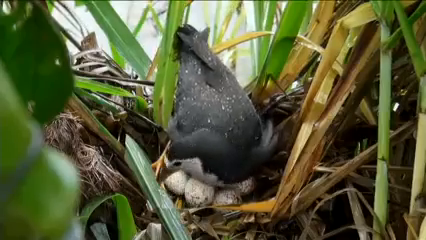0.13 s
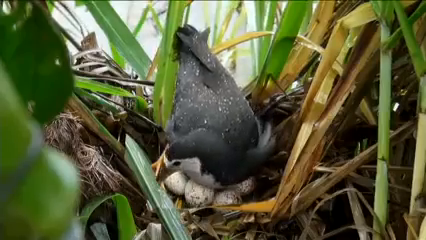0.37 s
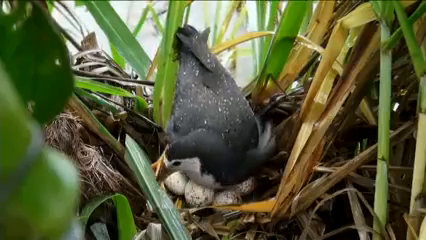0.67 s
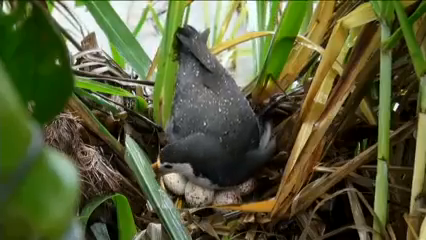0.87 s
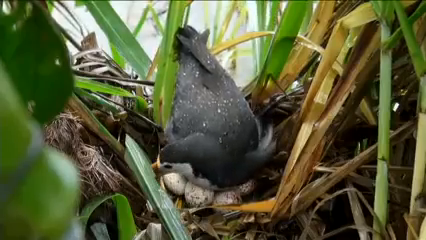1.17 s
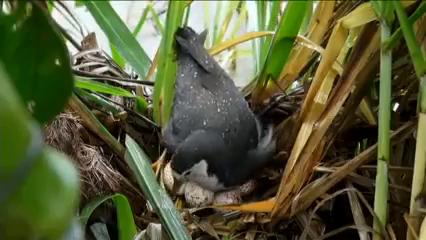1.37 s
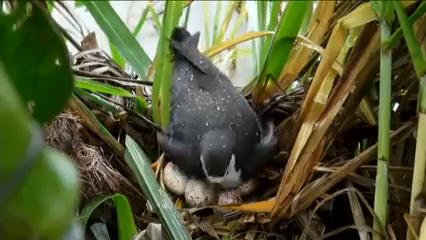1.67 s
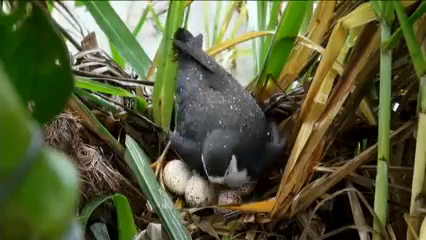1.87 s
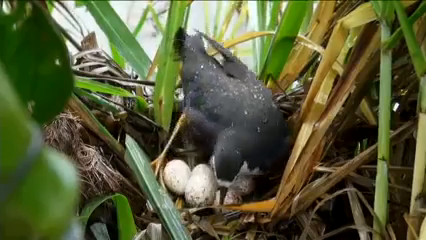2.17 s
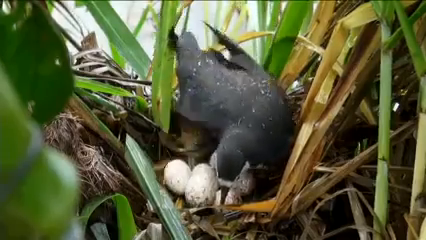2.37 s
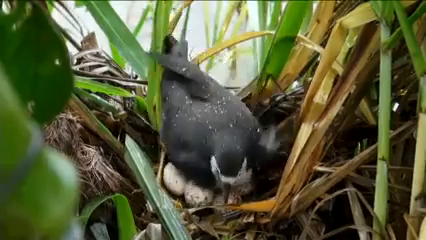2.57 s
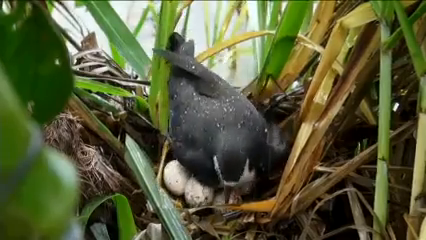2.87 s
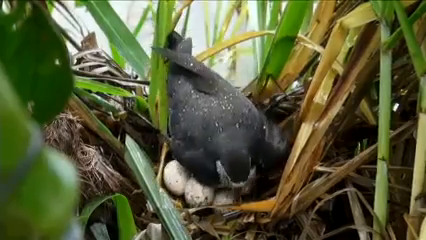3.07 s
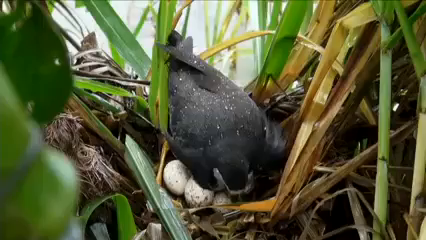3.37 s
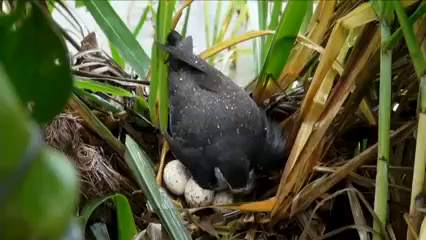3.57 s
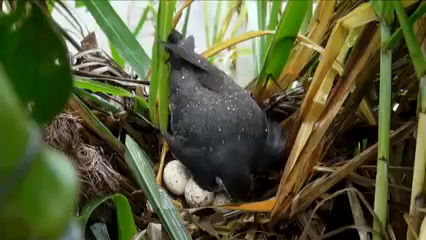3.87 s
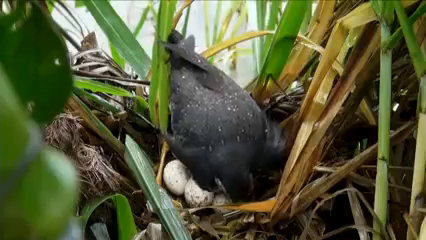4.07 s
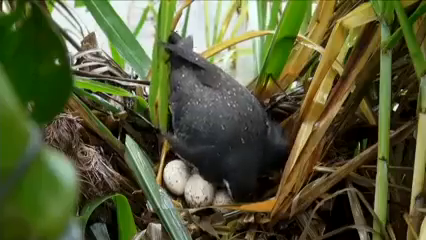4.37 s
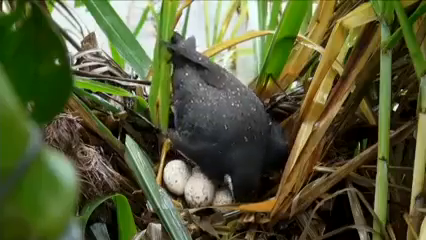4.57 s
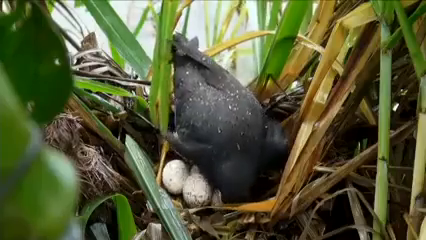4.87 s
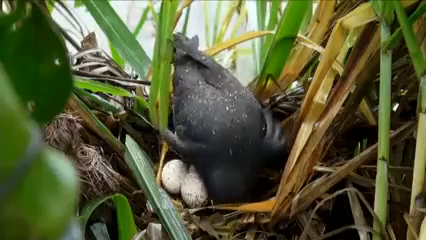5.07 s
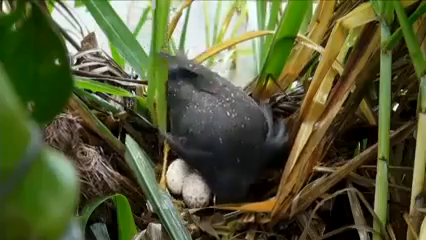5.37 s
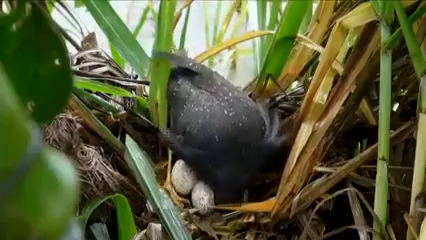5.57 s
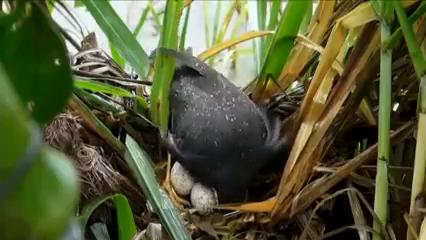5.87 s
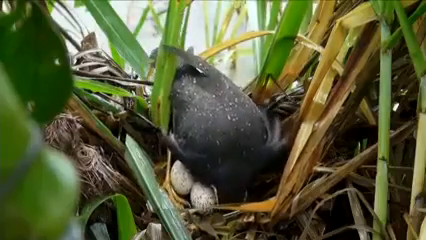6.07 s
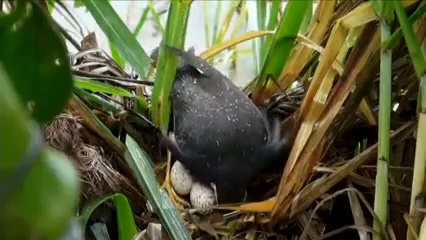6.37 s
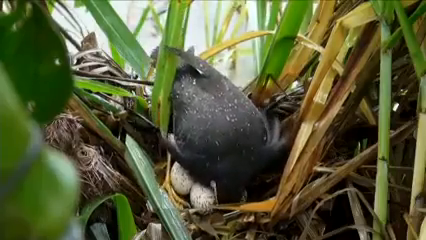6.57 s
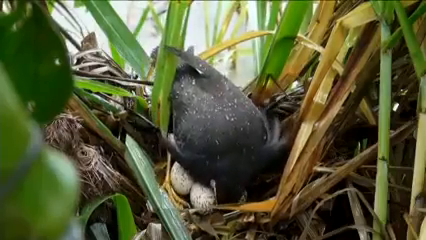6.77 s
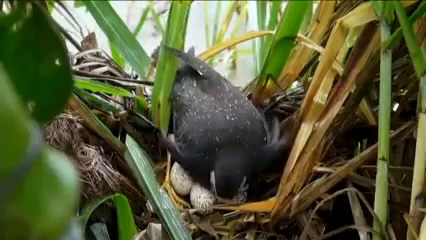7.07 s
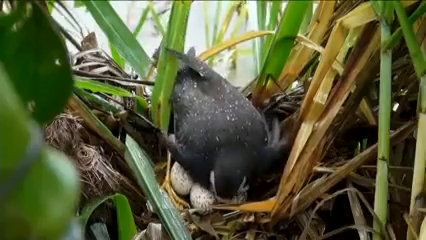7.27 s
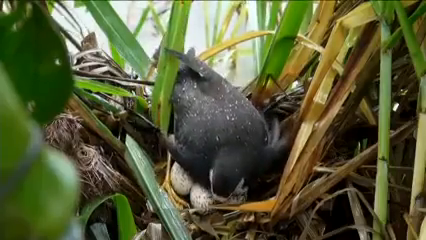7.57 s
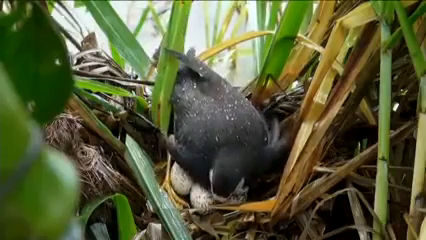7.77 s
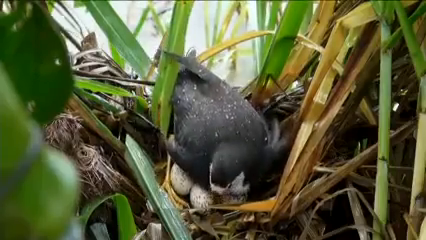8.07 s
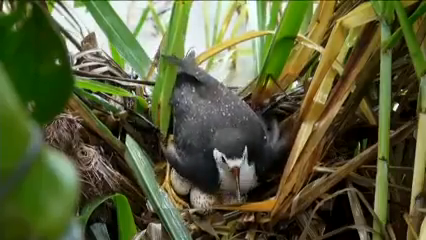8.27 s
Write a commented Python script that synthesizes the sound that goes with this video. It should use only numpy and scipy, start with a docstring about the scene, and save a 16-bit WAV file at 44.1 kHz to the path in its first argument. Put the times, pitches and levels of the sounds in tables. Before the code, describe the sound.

Close, irregular raindrops smack broad leaves and tick on dry stems over a soft, continuous wash of rainfall outdoors.

```python
"""A steady hiss of rain on a reed bed, soon broken by heavy drops that slap leaves close by.
Each heavy drop excites short blade modes, a crack and spray; its leaf knocks and shudders, then echoes.
Shattered drops patter in quick runs, droplets ring stems, and small drops tick on blades all around.
Far rain is band-filtered noise mixed with random impulses. The bed dips briefly at some of the slaps.
Damped resonances, decaying bursts of force and differences between the channels shape every near drop."""
import sys
import numpy as np
from scipy.fft import rfft, irfft, next_fast_len
from scipy.io import wavfile
from scipy.ndimage import uniform_filter1d, map_coordinates

SR = 44100
rng = np.random.default_rng(int(sys.argv[2]) if len(sys.argv) > 2 else 0)


def unload_wav(signal):
    """Save mono or channel-first audio to the path in sys.argv[1] as 16-bit WAV at rate SR, clipped to [-1, 1]."""
    wavfile.write(
        sys.argv[1],
        SR,
        np.round(np.clip(np.atleast_2d(signal).T, -1, 1) * 32767).astype(np.int16),
    )


N = 370881

# the loudest drops; a taut leaf only knocks, a loose one swings on:
# (time [s], slap level [dB], slap reference pitch [Hz], crack level [dB], spray level [dB],
#  thump level [dB], thump reference pitch [Hz], swing level [dB], left over right [dB])
HEAVY_DROPS = [(0.1143, -38, 1970, -39, -39, -37, 299, -41, 9),
               (0.1788, -23, 1500, -35, -53, -36, 397, -42.5, 8),
               (0.2823, -24, 1130, -45, -49, -43, 600, -45.5, 11),
               (0.312, -32, 1430, -33, -47, -34, 421, -47.5, 7),
               (0.3932, -30, 1110, -58, -45, -38, 205, -49, 7),
               (0.5632, -27, 1380.0, -42, -38, -33, 276, -41.5, 8),
               (0.572, -32, 1120.0, -35, -49, -29, 395, -46, 9),
               (0.6327, -53, 940.0, -58, -56, -32, 336, -43.5, 7),
               (0.7944, -55.0, 1200.0, -51, -55, -38.5, 334.0, -52, 8),
               (0.9258, -19.5, 1470, -23.5, -53, -26.5, 281, -42.5, 7),
               (1.236, -33, 1400.0, -37, -47, -36, 285, -65, 6),
               (1.2689, -24.5, 1360, -30, -59, -39, 613, -46, 2.5),
               (1.7096, -32, 1210, -41, -63, -33, 409, -47, -9.5),
               (1.9449, -32, 1020, -36, -47, -33.5, 350, -42, 8),
               (2.219, -55.0, 1100.0, -47, -62, -31.5, 258, -45.5, -3),
               (2.2497, -52, 1920.0, -28.5, -38, -36, 190, -50, 1),
               (2.3181, -21, 1210, -32, -39, -53, 606, -45.5, 3),
               (2.378, -47, 1100.0, -48, -70, -40, 402, -47, 8),
               (2.5205, -28.5, 920, -40, -50, -34.5, 571, -43.5, -4),
               (2.9393, -27.5, 1100, -32, -44, -28.5, 250, -37.5, -6),
               (2.95, -47, 1060.0, -49, -43, -33, 524, -37.5, -10),
               (3.1001, -25, 1190, -40, -40.5, -45, 597, -43.5, 5.5),
               (3.471, -22.5, 1100, -37, -65, -34, 571, -53, 5),
               (3.7489, -24.5, 1260, -46, -39, -37, 360, -40, 7),
               (3.7943, -32.5, 1710.0, -38, -37, -27.5, 315, -39, 8),
               (3.9436, -38, 1700.0, -40, -40, -35.5, 424, -50, -6),
               (4.1415, -35, 1164, -48, -36, -31.5, 202, -36.5, 8),
               (4.3644, -38, 1025, -55, -56, -38.5, 384, -57, 8),
               (4.546, -24.5, 1000.0, -58, -69, -25.5, 320, -37, -15),
               (4.761, -34.5, 1500, -34, -44, -35.5, 322, -45, 0),
               (4.8177, -34, 1330, -59, -50, -35.5, 371, -47, -5),
               (4.9956, -36, 1120, -48, -62, -39, 450, -54, 3.0),
               (5.1737, -24.5, 1390, -30.5, -33.5, -26, 393, -35.5, -6),
               (5.228, -27, 1210, -51, -41, -32.5, 362, -44, -10),
               (5.3174, -29.5, 1810, -30, -40, -36.5, 332, -47, 4),
               (5.523, -20, 1930, -48, -38, -36.5, 437, -45, 5),
               (5.757, -30.5, 1460, -46, -43, -45, 343, -54, 8),
               (5.809, -30.5, 940, -65, -62, -29, 408, -44.5, 9),
               (5.9044, -26.5, 1460, -31.5, -41, -35.5, 428, -43, 9.5),
               (6.086, -32, 2670, -38, -28, -61, 580, -51.5, -1),
               (6.2431, -21.5, 1540, -33, -30.5, -37, 403, -40.5, -3),
               (6.2828, -21.5, 1240, -30, -56, -55.0, 680, -53, 9),
               (6.3396, -31.5, 1370, -34, -56, -37, 320, -46.5, 7),
               (6.4378, -28, 1900, -28, -30.5, -31, 168.5, -42, -9),
               (6.537, -40, 1710.0, -33, -36, -33.5, 270, -51, 3),
               (6.632, -58, 950.0, -55, -63, -34.5, 530, -42, 9),
               (6.7625, -28.5, 1660, -43, -35, -30.5, 271, -44, -6),
               (6.787, -23, 1900, -54, -44, -52, 410.0, -67.0, -1),
               (6.8061, -27.5, 1400, -33, -38, -41, 432.0, -52, 0),
               (7.1174, -22.5, 760, -34, -49, -30, 203, -35.0, -9),
               (7.186, -22, 1600, -27.5, -44, -41, 680, -49, 2.5),
               (7.236, -32, 910, -42, -56, -34, 230, -49, -9),
               (7.297, -26.5, 1800, -35, -41, -64, 507, -53, -3),
               (7.3757, -32.5, 1230, -33, -54, -32.5, 321, -43, 5),
               (7.6118, -51, 950.0, -49, -66, -29.5, 313, -40.0, 5),
               (7.6992, -45, 2590, -51, -32, -34, 288, -41, 5),
               (7.7628, -33.5, 1360, -44, -50, -37, 297, -65.0, -6),
               (7.7873, -56, 1100.0, -49, -43, -29.5, 549, -52, -6),
               (7.8722, -30, 1300, -40, -52, -41, 367, -53, -3),
               (7.876, -28, 1700, -41, -57, -40, 390, -44, -3),
               (7.9856, -26, 1520, -26, -38, -63, 714, -71, -2),
               (8.2, -31, 1430, -43, -46, -50, 535, -47, 4),
               (8.222, -33, 1050.0, -53, -59, -56, 330, -44.5, 5)]
# spectrum of the fine spray thrown off by a drop: (frequency [Hz], level per Hz [dB])
SPRAY_SPECTRUM = [(2500, 5), (4500, 15.5), (6000, 9.5), (7300, 4), (8500, 0), (12000, -6), (16000, -23)]

SPAN = 8192  # samples that one drop may last
AGE = np.arange(SPAN) / SR  # time since a blow [s]
FREQS = np.fft.rfftfreq(SPAN, 1 / SR)  # [Hz]
ECHO_S = .091  # delay of the echo
# a bending leaf starts sharp by this fraction and sags in pitch with this time constant [s]
SHARP, SAG_S = 0.59, 0.0033


def amp(db):
    """Level in decibels to amplitude ratio."""
    return 10 ** (np.asarray(db) / 20)


def unit(x):
    """Normalization to an rms value of 1."""
    return x / np.sqrt(np.mean(x ** 2) + 1e-20)


def along(points, hz):
    """Linear interpolation of (Hz, value) points on a logarithmic frequency axis."""
    f, v = np.transpose(points)
    return np.interp(np.log(hz + 1), np.log(f + 1), v)


def wobble(rate):
    """Slow random modulation: a smooth curve through rate random knots a second."""
    knots = rng.standard_normal(int(N * rate / SR) + 4)
    return map_coordinates(knots, [np.arange(N) * rate / SR])


def lumps(depth_db, size):
    """Stepwise random modulation: a gain that jumps every size samples."""
    return amp(depth_db * rng.standard_normal(SPAN // size)).repeat(size)


def filtered(x, response):
    """Linear filtering: the spectrum of a whole track times a frequency response."""
    m = next_fast_len(N + SPAN)
    return irfft(rfft(x, m) * response(np.fft.rfftfreq(m, 1 / SR)), m)[..., :N]


def causal(points):
    """Minimum phase through (Hz, dB) points by folding the cepstrum: nothing sounds before the blow."""
    cepstrum = irfft(np.log(amp(along(points, FREQS))))
    cepstrum[1:SPAN // 2] *= 2
    cepstrum[SPAN // 2 + 1:] = 0
    return np.exp(rfft(cepstrum))


def resonance(hz, centre, q):
    """Frequency response of one damped mode with quality factor q."""
    damping = 1j * hz * centre / q
    return damping / (centre ** 2 - hz ** 2 + damping)


def soften(hz, edge_hz):
    """Two-pole low-pass: a drop takes time to flatten, so its force lacks high frequencies."""
    return 1 / (1 - (hz / edge_hz) ** 2 + 1j * np.sqrt(2) * hz / edge_hz)


def own_modes(hz, q, count):
    """Modal individuality: narrow modes scattered around a pitch, different at every call."""
    scatter_octaves = .45
    offsets = rng.standard_normal(count)
    return sum(resonance(FREQS, hz * 2 ** (scatter_octaves * offset), q) for offset in offsets)


def lasting(window):
    """Energy scaling: gain giving a sound of rms 1 over SPAN the energy of rms 1 over window seconds."""
    return np.sqrt(window * SR / SPAN)


def burst(envelope, response, firm, window):
    """Forced response: an impulse of strength firm plus decaying random force drives a filter, in stereo."""
    # difference between the channels for a near drop: (frequency [Hz], side over mid [ratio])
    side_ratio = [(25, 0.97), (70, 0.5), (150, 0.13), (300, 0.62), (600, 0.85), (1100, 0.96), (2200, 0.55),
                  (6000, 0.57)]
    mid, side = rng.standard_normal((2, SPAN)) * envelope / np.linalg.norm(envelope)
    mid[0] += firm
    side_response = response * along(side_ratio, FREQS)
    mid = unit(irfft(rfft(mid) * response))
    side = unit(irfft(rfft(side) * side_response))
    side *= np.linalg.norm(side_response) / np.linalg.norm(response)
    return unit(np.array([mid + side, mid - side])) * lasting(window)


def add(track, s, sound, pan_db):
    """Superposition at time s, placed by the level difference of left over right."""
    start = max(round(s * SR), 0)
    part = sound[:, :max(N - start, 0)]
    track[:, start:start + part.shape[1]] += part * unit(amp([[pan_db / 2], [-pan_db / 2]]))


def heavy_drops():
    """Impact excitation: a drop slaps a leaf and throws spray; the leaf knocks and shudders; a rough echo."""
    # spectrum of a shuddering leaf on its stem: (frequency [Hz], level per Hz [dB])
    shudder_spectrum = [(20, -16), (60, -10), (120, -3), (220, 7), (330, 2), (550, -4), (900, -12),
                        (2000, -18.5), (6000, -66)]
    firm = .75  # the clean blow of a drop against its rough part
    echo_db, rough_db = -12.5, -13  # rough echo and rough part of the knock, against the thump
    impacts, leaves = np.zeros((2, N)), np.zeros((2, N))
    spray_colour, shudder_colour = causal(SPRAY_SPECTRUM), causal(shudder_spectrum)
    contact = np.exp(-AGE / .0008) + .2 * np.exp(-AGE / .0035)
    splash = np.exp(-AGE / .002)
    push = np.exp(-AGE / .004) + .1 * np.exp(-AGE / .016)
    swing = np.exp(-AGE / 0.035) * (1 - np.exp(-AGE / 0.0027))
    for drop in HEAVY_DROPS + soft_drops(count=9):
        s, slap_db, slap_hz, crack_db, spray_db, thump_db, thump_hz, swing_db, pan_db = drop
        blade, skin, flex = blade_modes(slap_hz), water_skin(), flexing_leaf(thump_hz)
        slap = amp(slap_db) * burst(contact, blade, firm, window=0.0042)
        crack = amp(crack_db) * burst(contact, skin, firm, window=0.0024)
        spray = amp(spray_db) * burst(splash, spray_colour, firm=0.29, window=0.0033)
        # the echo is a fresh rough burst in the colours of slap and crack
        impact_echo = amp(thump_db + echo_db) * burst(push, skin + blade, firm=0, window=0.0057)

        thump = amp(thump_db) * knock(thump_hz, window=.02)
        thump += amp(thump_db + rough_db) * burst(push, flex, firm=0, window=.02)
        # the leaf's own modes outlast the knock, shaken unevenly as it swings
        narrow = 2 * own_modes(thump_hz, q=21.5, count=3) * soften(FREQS, edge_hz=1200)
        jolts = uniform_filter1d(lumps(depth_db=4.5, size=256), 64)
        tremble = shudder_colour + flex + narrow
        shudder = amp(swing_db) * burst(swing * jolts, tremble, firm=0, window=0.17)

        add(impacts, s, slap + crack + spray, pan_db)
        add(impacts, s + ECHO_S, impact_echo, 0)
        add(leaves, s, thump + shudder, 0.62 * pan_db)
    return impacts, leaves


def blade_modes(slap_hz):
    """Modal superposition: two short modes of the blade below the slap's pitch, and narrow ones around it."""
    low = resonance(FREQS, 0.53 * slap_hz, q=1.4)
    high = resonance(FREQS, 0.93 * slap_hz, q=0.75)
    blade = (low - 0.5 * high) * soften(FREQS, edge_hz=2700)
    return blade * (1 + 2 * own_modes(slap_hz, q=7.2, count=2))


def water_skin():
    """Damped resonance: the crack of the water on the blade, its pitch scattered from leaf to leaf."""
    typical_hz, scatter_octaves = 3210, 0.22
    crack_hz = typical_hz * 2 ** (scatter_octaves * rng.standard_normal())
    return -resonance(FREQS, crack_hz, q=4.3) * soften(FREQS, edge_hz=3900)


def flexing_leaf(thump_hz):
    """Bending resonance: two modes of opposite sign, dulled in proportion to the pitch of the leaf."""
    low = resonance(FREQS, 0.68 * thump_hz, q=3.6)
    high = resonance(FREQS, 2.0 * thump_hz, q=4.1)
    return (low - 0.42 * high) * soften(FREQS, edge_hz=4.2 * thump_hz)


def soft_drops(count):
    """Stratified random arrival: softer rows like HEAVY_DROPS, one in each equal stretch of time."""
    # a typical soft drop
    slap_db, slap_hz, crack_db, spray_db = -42, 1270, -52, -45
    thump_db, thump_hz, swing_db = -44.5, 320, -55
    scatter_db, scatter_octaves, scatter_pan_db = 3, .4, 5
    times = (np.arange(count) + rng.random(count)) * N / SR / count
    rows = []
    for s, (force, stiff, give, narrow, place) in zip(times, rng.standard_normal((count, 5))):
        rows.append((s, slap_db + scatter_db * force, slap_hz * 2 ** (scatter_octaves * stiff),
                     crack_db + scatter_db * force, spray_db + scatter_db * stiff,
                     thump_db + scatter_db * give, thump_hz * 2 ** (scatter_octaves * narrow),
                     swing_db + scatter_db * give, scatter_pan_db * place))
    return rows


def sagging_phase(hz):
    """Frequency glide: the phase [rad] of a bending mode that starts sharp and sags as the leaf gives way."""
    return 2 * np.pi * hz * np.cumsum(1 + SHARP * np.exp(-AGE / SAG_S)) / SR


def knock(thump_hz, window):
    """Damped bending modes: a leaf's modes swell, die and fall in pitch, out of step between the channels."""
    # modes of a flexing leaf: (pitch over thump pitch [ratio], level [dB], decay [s])
    modes = [(0.422, -11, 0.0096), (0.722, 4.5, 0.0045), (1.2, 0, 0.005), (1.9, -8, 0.007)]
    attack_s, out_of_step = 0.0017, 0.46  # the lead or lag [rad] is at the thump pitch
    phase = sagging_phase(thump_hz)
    lags = out_of_step * rng.choice([-1, 1], len(modes))
    ring = np.zeros((2, SPAN))
    for (ratio, db, decay), lag in zip(modes, lags):
        ring += amp(db) * np.exp(-AGE / decay) * np.sin(ratio * (phase + np.array([[lag], [-lag]])))
    return unit(ring * (1 - np.exp(-AGE / attack_s))) * lasting(window)


def bends():
    """Coupled bending: a broad leaf knocks roundly over a deep swing and fans air; its stem hums on."""
    # drops that bend a broad leaf as a whole:
    # (time [s], body level [dB], body pitch after the sag [Hz], deep swing level [dB])
    broad_leaves = [(0.3932, -36, 195, -65), (0.563, -41.5, 150, -41), (0.9257, -50, 150, -40),
                    (2.249, -40, 141, -55), (2.9384, -40, 148, -44), (3.7956, -57, 141, -42),
                    (4.142, -33, 172, -41), (4.546, -26.5, 179, -41.5), (5.1741, -34, 183, -55),
                    (6.4393, -40, 135, -44), (6.7633, -41, 172, -55), (7.1169, -35, 157, -32)]
    attack_s, body_decay_s = 0.0032, 0.0045
    deep_ratio, deep_decay_s = 0.59, .011  # pitch of the deep swing over the body pitch
    stem_db, stem_hz, stem_decay_s = -4.5, 171, 0.056  # level against the body
    puff_db, puff_edge_hz = -8, 70  # fanned air: level against the deep swing, upper edge
    track = np.zeros((2, N))
    swell = 1 - np.exp(-AGE / attack_s)
    deep_envelope = swell * np.exp(-AGE / deep_decay_s)
    hum = np.exp(-AGE / stem_decay_s) * (1 - np.exp(-AGE / body_decay_s)) ** 2
    scale = lasting(.04)
    for s, body_db, body_hz, deep_db in broad_leaves:
        phase = sagging_phase(body_hz)
        body = unit(swell * np.exp(-AGE / body_decay_s) * np.sin(phase))
        deep = unit(deep_envelope * np.sin(deep_ratio * phase))
        # the stem's pitch is unsteady
        stem_phase = 2 * np.pi * stem_hz * np.cumsum(lumps(depth_db=2.4, size=256)) / SR
        stem = unit(hum * np.sin(stem_phase))
        puff = burst(deep_envelope, soften(FREQS, puff_edge_hz), firm=0, window=.04)
        bend = amp(body_db) * scale * (body + amp(stem_db) * stem)
        bend = bend + amp(deep_db) * (scale * deep + amp(puff_db) * puff)
        # the leaf leans to the side of the drop nearest in time
        *_, pan_db = min(HEAVY_DROPS, key=lambda drop: abs(drop[0] - s))
        add(track, s, bend, pan_db / 2)
    return track


def echo(leaves, delay, level_db):
    """Echo as a pure delay: the low leaf sounds return once, softly, delay seconds later."""
    return leaves + amp(level_db) * filtered(leaves, lambda hz: np.exp(-2j * np.pi * hz * delay))


def splats():
    """Impulse train: a drop shatters over several blades as a quick, uneven run of decaying droplets."""
    # runs of droplets: (time [s], level [dB], length [s]); most are shattered drops, while the run at 4.645 s
    # follows the heavy drop at 4.546 s
    shattered = [(0.168, -35, 0.012), (0.547, -32, 0.027), (2.248, -34.5, 0.0084), (4.645, -41, 0.0056),
                 (4.892, -42, .014), (6.763, -33, 0.0094), (7.369, -40, 0.018)]
    gap_s, droplet_decay_s = .0045, .0009
    track = np.zeros((2, N))
    colour = resonance(FREQS, 1150, q=0.085) * soften(FREQS, edge_hz=3200)
    for s, db, length in shattered:
        starts = np.arange(0, length, gap_s)
        starts = starts + gap_s * rng.random(16)[:len(starts)] / 2
        since = AGE - starts[:, None]
        droplets = np.sum((since >= 0) * np.exp(-np.abs(since) / droplet_decay_s), axis=0)
        add(track, s, amp(db) * burst(droplets, colour, firm=0, window=length), 0)
    return track


def ticks():
    """Struck resonator: a droplet on a dry stem rings it for a few cycles and throws a little spray."""
    # droplets on dry stems: (time [s], level [dB], pitch [Hz])
    droplets = [(.2016, -40, 2400), (.263, -35, 1800), (.729, -37, 3000), (0.961, -37, 4000),
                (1.357, -37, 4520), (1.8587, -33.5, 3580), (2.338, -40, 2500), (2.5718, -29.5, 2370),
                (2.673, -36, 450), (2.695, -36.5, 2500), (3.294, -38, 4070), (3.4102, -35, 3000),
                (4.751, -39, 4500), (5.4926, -32.5, 3260), (5.5424, -30, 2000), (5.9733, -30.5, 2590),
                (6.903, -39, 3480), (6.9439, -30, 1600), (7.2765, -42, 2980), (8.351, -39, 4500)]
    tick_spray_db = -8.5  # against the tick
    track = np.zeros((2, N))
    spray_colour = causal(SPRAY_SPECTRUM)
    for s, db, hz in droplets:
        stem = resonance(FREQS, hz, q=4.5) * soften(FREQS, edge_hz=4500)
        ring = burst(np.exp(-AGE / .0003), stem, firm=2, window=.0031)
        spray = burst(np.exp(-AGE / 0.0031), spray_colour, firm=0.24, window=0.0036)
        add(track, s, amp(db) * (ring + amp(tick_spray_db) * spray), 0)
    return track


def patter(rate, spread_db):
    """Random arrivals: on average rate impulses a second, of uneven size and either sign, at rms 1."""
    draws = rng.random((N, 2))
    hit = draws[:, 0] < rate / SR
    # sizes are exponentially distributed in decibels, up to a limit
    size = amp(spread_db * np.minimum(-np.log(1 - draws[:, 1]), 4))
    return unit(hit * size * rng.choice([-1, 1], N))


def small_drops(level_db, rate, q, low_hz, high_hz, count):
    """Randomly excited resonators: light drops tick on nearby blades, each with its own pitch and place."""
    track = np.zeros((2, N))
    for pitch in np.geomspace(low_hz, high_hz, count):
        impulses = patter(rate, spread_db=2.5)
        blade = filtered(impulses, lambda hz: resonance(hz, pitch, q) * soften(hz, edge_hz=2360))
        add(track, 0, np.array([unit(blade)] * 2), rng.normal(0, 3.9))
    return amp(level_db) * unit(track)


def rainfall():
    """Incoherent summation: wash on ground and water and hiss in foliage share one level curve."""
    # level of the bed of rain, which sags after some hard slaps: (time [s], level [dB])
    bed_level = [(0.0, -45), (1.66, -43), (1.85, -41.5), (2.2, -42), (2.41, -46), (3.21, -45), (4.12, -43),
                 (4.61, -42), (4.97, -41), (6.11, -42.5), (6.98, -40.5), (7.24, -46), (8.41, -42.5)]
    # spectrum of far rain on ground and water: (frequency [Hz], level per Hz [dB])
    wash_spectrum = [(20, -25), (60, -6), (130, -3), (260, -3), (600, 1), (1200, 1), (1900, -1.5),
                     (3000, -10.5), (6000, -82)]
    # spectrum of far rain on foliage: (frequency [Hz], level per Hz [dB])
    hiss_spectrum = [(400, -61), (1200, -14), (2200, 0), (3900, 0), (5000, -4), (6500, -9.5), (7500, -12.5),
                     (8200, -18.5), (10000, -21.5), (13400, -31), (14500, -56), (16000, -75)]
    wash_db, hiss_db = -2.5, -2  # against the shared level curve
    bed_db = np.interp(np.arange(N) / SR, *np.transpose(bed_level))
    # drops arrive in loose clumps, partly shared by ground and foliage
    flurry_db = .6 * wobble(14)
    clumps_db = .8 * wobble(55)
    wash = far_rain(wash_spectrum, rate=500, spread_db=2.5, grain=0.77, patchy_db=1.6,
                    low_hz=293, high_hz=1670, count=3)
    hiss = far_rain(hiss_spectrum, rate=900, spread_db=1, grain=0.72, patchy_db=1.53,
                    low_hz=1760, high_hz=8530, count=4)
    wash = amp(bed_db + wash_db + flurry_db) * wash
    return wash + amp(bed_db + hiss_db + flurry_db + clumps_db) * hiss


def far_rain(spectrum, rate, spread_db, grain, patchy_db, low_hz, high_hz, count):
    """Shot noise over a noise blur of farther drops; each size of leaf has its own band and swells."""
    # correlation of the two channels: (frequency [Hz], correlation [0-1])
    correlation = [(100, 1), (400, 0.94), (1300, 0.6), (2800, 0.93), (5000, 0.8), (8000, 0.02), (13000, 1)]
    pair = np.zeros((2, N))
    for own in np.eye(count):
        band = list(zip(np.geomspace(low_hz, high_hz, count), own))
        blur = rng.standard_normal((2, N))
        drops = blur + grain * np.array([patter(rate, spread_db), patter(rate, spread_db)])
        pair += filtered(drops * amp(patchy_db * wobble(17)), lambda hz: np.sqrt(along(band, hz)))

    def mid_side(hz):
        """Partial coherence: this division of energy between mid and side sets the correlation."""
        turn = np.arccos(np.clip(along(correlation, hz), -1, 1)) / 2
        return amp(along(spectrum, hz)) * np.array([np.cos(turn), np.sin(turn)])

    mid, side = filtered(pair, mid_side)
    return unit(np.array([mid + side, mid - side]))


def dips(recovery):
    """Gain modulation: the level of the bed sinks quickly at some of the slaps and creeps back."""
    # starts of the dips: time [s]
    dip_times = [1.269, 2.518, 3.101, 4.547, 5.177, 5.9018, 6.245, 7.1855, 8.198]
    dip_db, deepest_s = -26.5, .011  # depth, and time from the start to the bottom
    level_db = np.zeros(N)
    shape = np.minimum((AGE / deepest_s) ** 2, np.exp((deepest_s - AGE) / recovery))
    for s in dip_times:
        start = round(s * SR)
        level_db[start:start + SPAN] += dip_db * shape[:N - start]
    return amp(level_db)


def scene():
    """Superposition: near drops stand in front of the bed of rain."""
    impacts, leaves = heavy_drops()
    blades = small_drops(level_db=-54.5, rate=11, q=13.0, low_hz=565, high_hz=3840, count=10)
    stems = small_drops(level_db=-51.5, rate=16, q=3.5, low_hz=1300, high_hz=5000, count=8)
    bed = (rainfall() + blades + stems) * dips(recovery=0.011)
    echoing = echo(leaves + bends(), delay=ECHO_S, level_db=-13.5)
    return impacts + bed + splats() + ticks() + echoing


def record(dry):
    """Soft saturation rounds off the tallest peaks; a band limit then removes the highest treble."""
    ceiling, top_hz = 0.35, 15800
    rounded = dry / (1 + (dry / ceiling) ** 4) ** (1 / 4)
    return filtered(rounded, lambda hz: hz < top_hz)


dry = scene()
out = record(dry)
unload_wav(out)
```